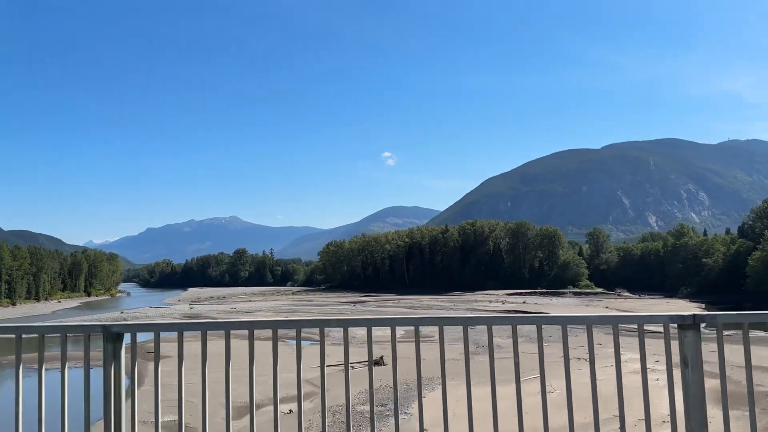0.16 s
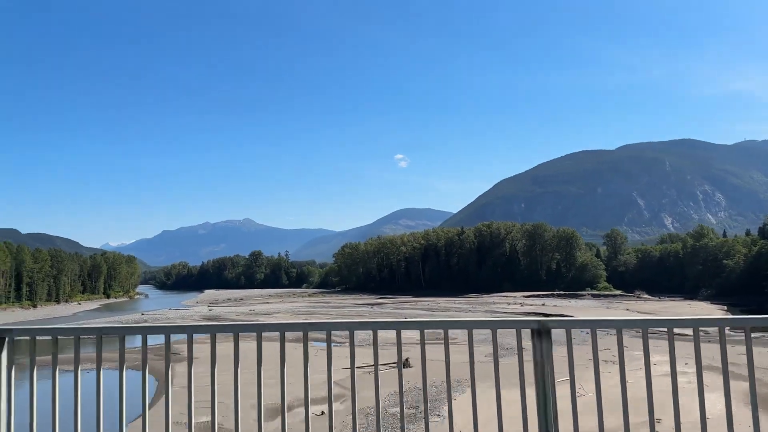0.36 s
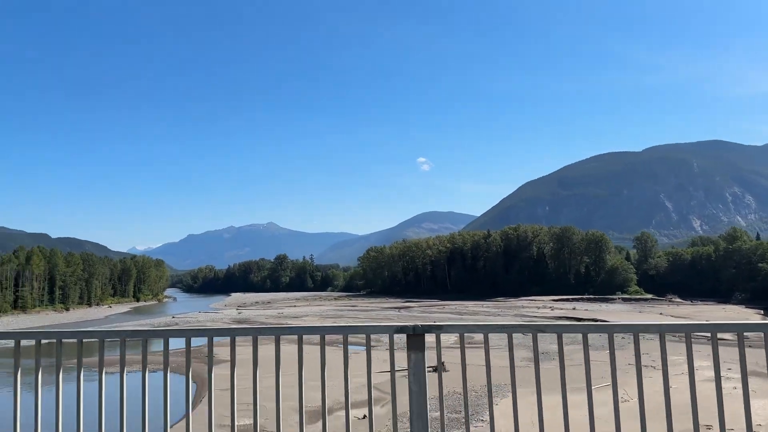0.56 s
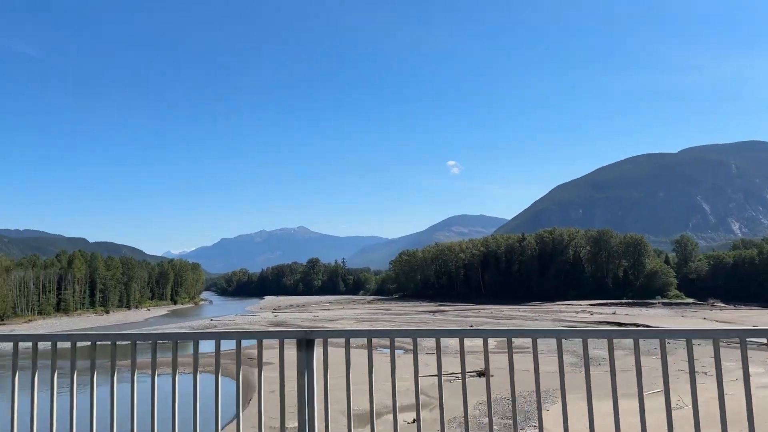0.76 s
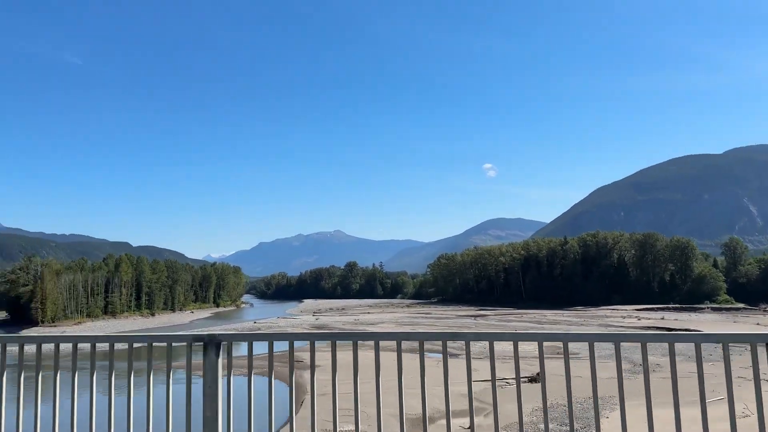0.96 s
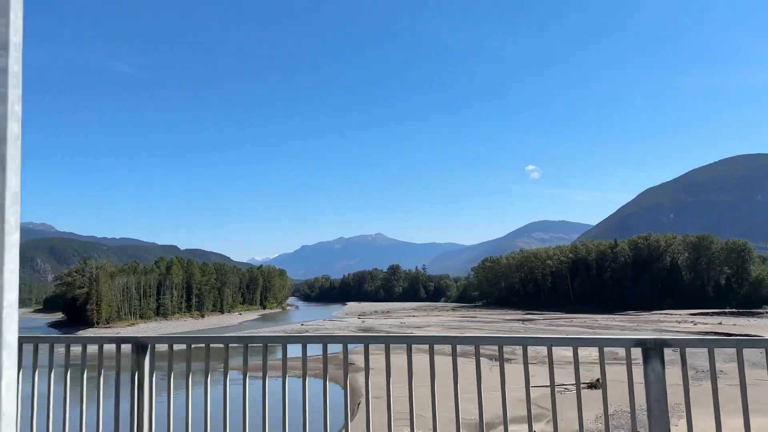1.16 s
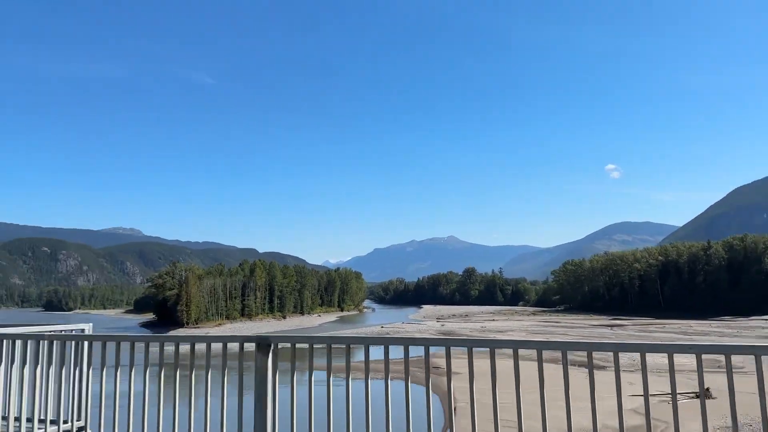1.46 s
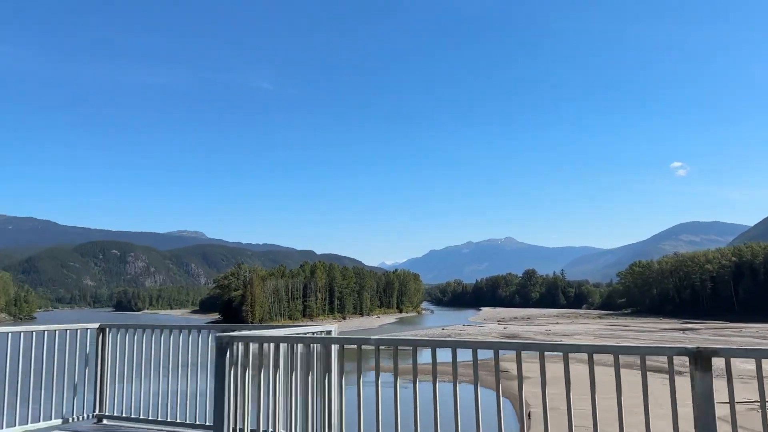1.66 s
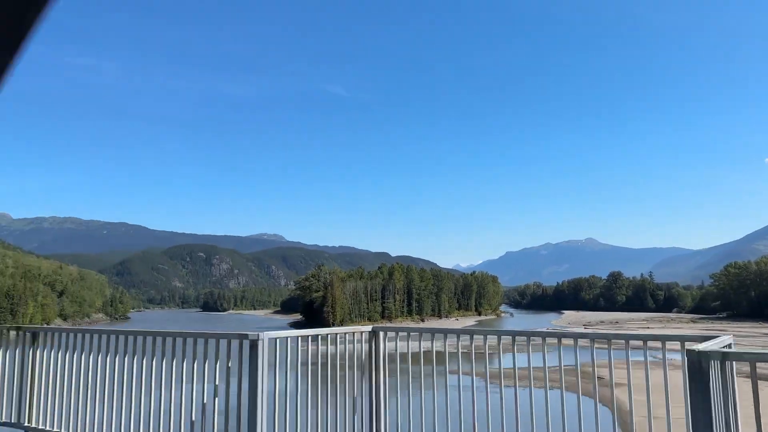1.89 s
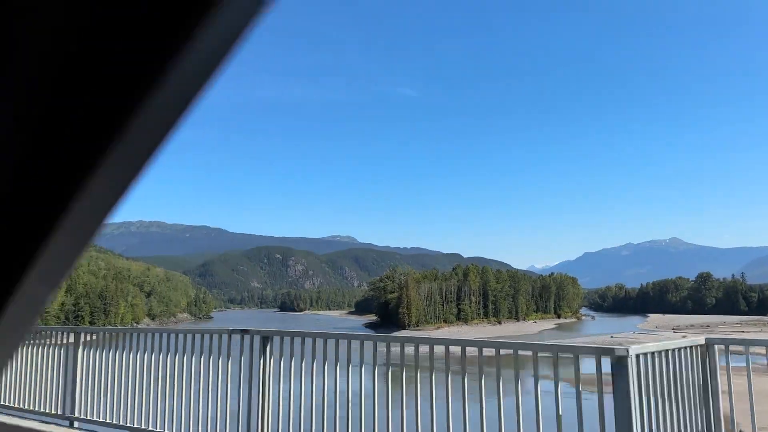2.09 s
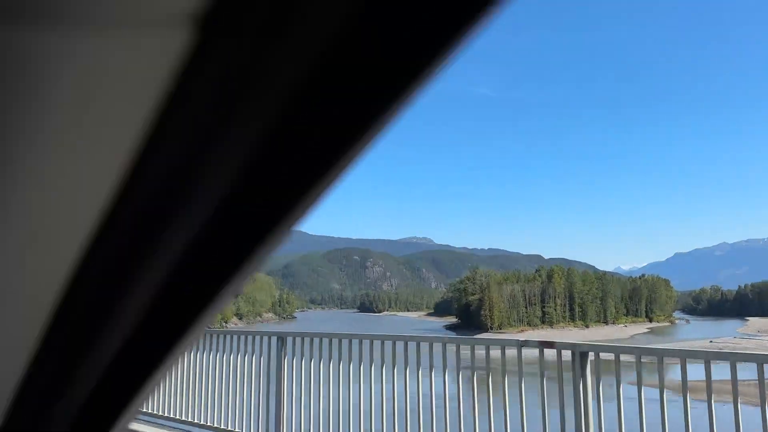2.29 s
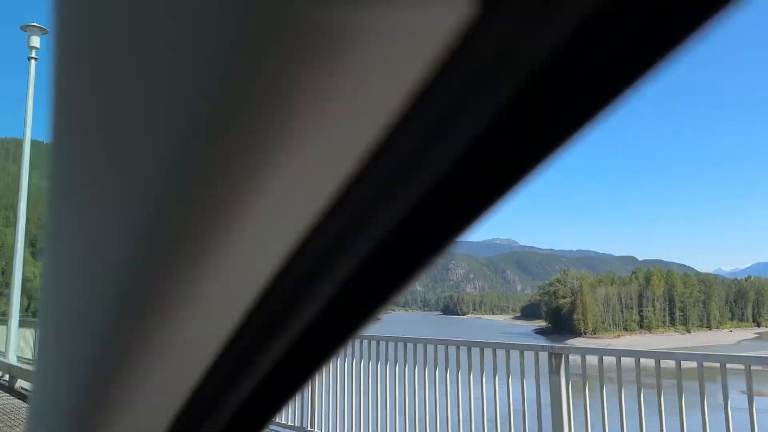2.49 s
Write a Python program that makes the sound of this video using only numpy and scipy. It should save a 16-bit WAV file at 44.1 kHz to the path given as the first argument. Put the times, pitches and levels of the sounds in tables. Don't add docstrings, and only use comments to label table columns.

```python
import sys
import numpy as np
from scipy import signal
from scipy.fft import rfft, irfft
from scipy.io import wavfile
from scipy.ndimage import uniform_filter1d

SR = 44100
rng = np.random.default_rng(int(sys.argv[2]) if len(sys.argv) > 2 else 0)


def boost(x):
    u = np.asarray(x, float) / 20
    return 10 ** u


def materialize(psi):
    bounded = np.clip(np.atleast_2d(psi).T, -1, 1)
    quanta = np.round(bounded * 32767).astype(np.int16)
    wavfile.write(sys.argv[1], SR, quanta)


N = 116424
FIRING_HZ = 87.45

# time in seconds, level in dB.
ROAD_LOAD = [(0.0, -34), (.1, -37.5), (0.29, -30), (0.4, -35), (0.67, -38.5), (.84, -31.5), (.97, -37),
             (1.09, -31.5), (1.2, -32.5), (1.3, -32.5), (1.54, -32), (1.7, -29), (1.9, -30), (1.99, -30),
             (2.1, -31), (2.27, -31.5), (2.4, -28.5), (2.5, -31.5), (2.64, -31)]


def evened(x):
    return x / np.sqrt(np.mean(x ** 2) + 1e-20)


def read(points, hz, axis=1):
    columns = np.transpose(points)
    return np.interp(np.log(hz + 1), np.log(columns[0] + 1), columns[axis])[:, None]


def along(table, t):
    times, *columns = np.transpose(table)
    return [np.interp(t, times, column) for column in columns]


def road_load_db():
    return along(ROAD_LOAD, np.arange(N) / SR)[0]


def add(mix, start, sound):
    part = mix[..., round(start * SR):][..., :sound.shape[-1]]
    part += sound[..., :part.shape[-1]]


def layer(sounds):
    out = np.zeros((2, N))
    for start, sound in sounds:
        add(out, start, sound)
    return out


def ease_in(progress):
    return np.sin(np.pi / 2 * np.minimum(progress, 1)) ** 2


def resonate(x, hz, width):
    turn = np.exp(2j * np.pi * hz * np.arange(x.shape[-1]) / SR)
    r = np.exp(-np.pi * width / SR)
    return 2 * (turn * signal.lfilter([(1 - r) ** 2], [1, -2 * r, r * r], x / turn)).real


def drift(size, rate_hz):
    z = rfft(rng.standard_normal(size))
    return evened(irfft(z / (1 + (np.fft.rfftfreq(size, 1 / SR) / rate_hz) ** 4), size))


def wash(shape, size, level_db, patchy_db, flicker_db):
    # frequency in Hz, likeness of the ports (0 to 1), phase between them in radians,
    # left-right level in dB.
    ports = [(30, .97, 0, -1), (70, .7, 0, 2.4), (300, .85, -.08, .6), (1000, .41, -.5, 4.5),
             (1400, .2, .6, 2.9), (2300, .68, 0, 2.4), (3200, .52, -1.1, 2.6), (5600, .3, -.3, 4.6),
             (7000, .58, -1.4, 2.7), (8300, .86, -2.9, 1.3), (9400, .62, -1.1, .2), (11000, 1, 0, 0),
             (13400, 1, 0, 0), (15500, .7, 2.9, -.4)]
    # time in seconds, share of the left-right level heard as the phone pans.
    pan_turn = [
        (0, 1.3),
        (1.3, 1.36),
        (2.1, 0.6),
        (2.64, 0.68),
    ]
    hop = size // 4
    frames, hz = N // hop + 5, np.fft.rfftfreq(size, 1 / SR)
    a, b, c, d, patches = rng.standard_normal((frames, len(hz), 5)).T
    patches = evened(uniform_filter1d(uniform_filter1d(patches, size=8, axis=0), size=10, axis=1))
    flicker = evened(uniform_filter1d(rng.standard_normal(frames), size=6))

    same = np.clip(read(ports, hz), 0, 1)
    left = a + 1j * b
    shared = same * left * np.exp(1j * read(ports, hz, axis=2))
    right = shared + np.sqrt(1 - same ** 2) * (c + 1j * d)
    lean = read(ports, hz, axis=3) * along(pan_turn, np.arange(frames) * hop / SR)[0] / 2
    z = np.array([left, right])
    z *= boost(read(shape, hz) + patchy_db * patches + flicker_db * flicker + np.array([lean, -lean]))
    noise = signal.istft(z, nperseg=size, noverlap=size - hop)[1][:, :N]
    return boost(level_db) * evened(noise)


def tyre_rumble():
    # frequency in Hz, density in dB per Hz.
    rumble_spectrum = [(12, -62), (27, -34), (50, 1.5), (71, 3), (100, -18.5), (131, 1.5), (178, -4),
                       (317, -11.5), (526, -9), (1500, -35.5), (1950, -45), (3300, -120)]
    return wash(rumble_spectrum, size=2048, level_db=road_load_db() + 9, patchy_db=2.0, flicker_db=-0.5)


def wind_hiss():
    # frequency in Hz, density in dB per Hz.
    hiss_spectrum = [(600, -4.5), (1100, -7), (2000, -9.5), (2900, -16), (5500, -23.5), (7500, -25.5),
                     (8300, -24.5), (9300, -25.5), (11000, -31), (16000, -56)]
    road_db = road_load_db()
    level_db = -44.5 + 0.063 * (road_db - road_db.mean())
    return wash(hiss_spectrum, size=512, level_db=level_db, patchy_db=-2.8, flicker_db=0.0)


def engine():
    # time in seconds, firing order, second order and third order in dB.
    drone_levels = [(0, -31.5, -13.5, -42), (.05, -43.5, -49, -62), (.41, -48, -37.5, -59),
                    (.55, -28, -44, -50), (.64, -41, -34, -52), (.69, -32.5, -21.5, -49),
                    (.81, -34, -22.5, -36), (.85, -35, -39.5, -46), (1.09, -23, -25.5, -45),
                    (1.23, -41, -33.5, -46), (1.34, -33.5, -31, -39), (1.58, -30, -30, -30),
                    (1.83, -29, -22.5, -34.5), (1.88, -28, -33.5, -40.5), (2.42, -34, -30.5, -40),
                    (2.45, -30.5, -39, -30), (2.485, -10.5, -33, -36), (2.64, -17, -31, -37.5)]
    # order, level in dB at full road load.
    upper_orders = [(.5, -40), (4, -35.5), (5, -35), (6, -48.5)]
    load_lift = 2.43
    speed_wander, blur, blur_hz = 0.0037, 0.24, 14

    road_db = road_load_db()
    orders = list(enumerate(along(drone_levels, np.arange(N) / SR), start=1))
    for order, full_db in upper_orders:
        orders.append((order, load_lift * (road_db - road_db.max()) + full_db))

    turns = np.cumsum(FIRING_HZ * (1 + speed_wander * drift(N, 2.4))) / SR
    out = np.zeros(N)
    for order, db in orders:
        fuzz = 1 + blur * (drift(N, blur_hz) + 1j * drift(N, blur_hz))
        line = np.exp(2j * np.pi * (order * turns + rng.random()))
        out += (boost(db) + boom_swells(order)) * (fuzz * line).real
    return 1.49 * out * boost([[.6], [-.6]])


def blow(start, thump_db, start_hz, knock_db, knock_hz):
    thump_hz, thump_drop, sag_s = 75.4, 1.165, 0.0027
    thump_t60, knock_t60 = 0.13, 0.038
    t = np.arange(0, .2, 1 / SR)
    cycles = np.cumsum(thump_hz + thump_drop * (start_hz - thump_hz) * np.exp(-t / sag_s)) / SR
    thump = boost(thump_db - 60 * t / thump_t60) * np.sin(2 * np.pi * cycles) * ease_in(t * start_hz / 0.43)
    knock = boost(knock_db - 60 * t / knock_t60) * np.sin(2 * np.pi * knock_hz * t) * ease_in(t / 0.0021)
    return start, (thump + knock) * boost([[.8], [-.8]])


def handling_knocks():
    # start in seconds, thump level in dB, thump start pitch in Hz, knock level in dB,
    # knock pitch in Hz.
    handling_blows = [(.001, -50, 200, -8.5, 186), (0.198, -38, 200, -7, 185), (0.2518, -8.5, 250, -8, 186),
                      (.318, -43, 200, -11, 165), (0.3488, -28, 300, -4.5, 234), (.417, -17.5, 200, -8.5, 511),
                      (0.4233, -35, 200, -14, 562), (.4255, -29, 201, -14, 413),
                      (0.4235, -12, 330, -16.5, 300), (0.447, -17, 120, -42, 200),
                      (0.559, -19.5, 250, -13, 268), (0.8117, -10.5, 250, -9, 191), (0.905, -8, 130, -37, 175),
                      (1.1342, -1.5, 414, -9.5, 325), (1.154, -20, 200, -13, 202),
                      (1.1658, -9.5, 121, -18, 464), (1.945, -7.5, 150, -29, 197), (2.033, -7, 120, -24, 180),
                      (2.1416, -37, 200, -2.5, 161), (2.1482, -13, 200, 1, 167), (2.163, 0.5, 100, -32, 200),
                      (2.1876, 1, 180, -11.5, 414), (2.337, -20, 150, -11, 180)]
    return layer(blow(*row) for row in handling_blows)


def rub(air, start, length, db, hz, width=33.0):
    shake = air[:, round(start * SR):][:, :round(length * SR)]
    u = np.linspace(0, 1, shake.shape[1])
    grain = boost(1.5 * evened(uniform_filter1d(rng.standard_normal(6000)[:len(u)], size=90)))
    return start, boost(db) * evened(resonate(shake * grain, hz, width)) * np.sin(np.pi * u ** .7)


def finger_rustles(air):
    # start in seconds, length in seconds, level in dB, centre in Hz, width in Hz.
    case_rustles = [(0, 0.023, -69, 4000, 5970), (0.17, .055, -47.5, 4500, 3520),
                    (0.423, 0.071, -53.5, 4800, 3960), (0.787, .04, -74, 12900, 2450),
                    (1.11, .03, -71.5, 8000, 5000), (1.315, 0.094, -53, 6600, 5960),
                    (1.555, 0.046, -54, 11100, 3490), (1.735, .03, -63.5, 12500, 3930),
                    (2.24, .025, -58, 7840, 1480), (2.48, 0.032, -51.5, 5830, 8050),
                    (2.54, 0.023, -73, 12200, 4000)]
    return layer(rub(air, *row) for row in case_rustles)


def tick(start, level_db, hz):
    # delay in seconds, level in dB.
    bounces = [
        (0, 2),
        (.0012, -11),
        (.0024, -12),
        (.0034, -1),
    ]
    t = np.arange(0, .012, 1 / SR)
    jitter = rng.uniform(0.7, 1.19, (2, len(bounces)))
    out = 0
    for k, (delay, db) in enumerate(bounces):
        u = 2 * np.pi * hz * (t - delay * jitter[:, k:k + 1]) - 5.5
        out = out - (-1) ** k * boost(db) * np.sin(u) * np.exp(-(u / 3.82) ** 2)
    return start, boost(level_db) * out * ease_in(t * hz / 0.5) * boost([[1.5], [-1.5]])


def contact_ticks():
    # start in seconds, level in dB, pitch in Hz.
    tick_events = [(0.056, -35, 700), (.250, -23, 1450), (0.25, -16.5, 547), (.348, -10.5, 650),
                   (0.348, -26.5, 1390), (.419, -28, 1490), (0.423, -26.5, 990), (0.426, -29.5, 1420),
                   (.557, -29, 650), (0.8105, -22.5, 730), (0.8112, -18.5, 1500), (0.8128, -21, 900),
                   (.8125, -26.5, 2270), (0.8125, -27.5, 1600), (0.8133, -42, 3900), (1.001, -30, 736),
                   (1.094, -38, 686), (1.131, -34, 2220), (1.131, -22.5, 1620), (1.1314, -16.5, 770),
                   (1.155, -33.5, 1410), (1.426, -21, 627), (1.598, -23.5, 630), (1.905, -19.5, 570),
                   (2.477, -24, 704)]
    return layer(tick(*row) for row in tick_events)


def boom_swells(order):
    # start in seconds, length in seconds, level in dB, nearby pitch in Hz.
    cabin_booms = [(0.082, 0.062, -20.5, 175), (0.142, 0.13, -23, 175), (0.309, 0.064, -17.5, 175),
                   (0.995, 0.059, -29.5, 175), (1.257, 0.18, -27.5, 175), (1.33, 0.12, -26, 88),
                   (1.424, .13, -26, 175), (1.44, .1, -23.5, 88), (1.3, 0.15, -34, 263),
                   (1.46, 0.12, -34, 263), (1.572, .08, -23.5, 175), (1.604, .13, -22.5, 88),
                   (1.663, 0.17, -30.5, 175), (1.683, .08, -34, 263), (1.727, 0.067, -28.5, 88),
                   (1.768, 0.051, -29.5, 175), (1.76, 0.087, -27.5, 263), (1.826, 0.044, -25, 175),
                   (1.916, 0.095, -22, 175), (1.934, 0.058, -24.5, 263), (1.997, 0.092, -26.5, 175),
                   (1.998, 0.089, -22, 88), (2.1, 0.032, -21, 175), (2.213, 0.11, -25, 175),
                   (2.316, .11, -23, 175), (2.31, 0.037, -26, 88), (2.534, 0.078, -25, 175),
                   (1.558, 0.058, -30.5, 438), (1.891, 0.051, -28.5, 525), (2.569, 0.077, -31.5, 350),
                   (1.685, 0.18, -35, 350), (1.68, 0.16, -37, 525)]
    out = np.zeros(N)
    for start, length, db, hz in cabin_booms:
        if round(hz / FIRING_HZ) == order:
            add(out, start, boost(db) * np.hanning(round(length * SR)) ** 0.51)
    return out


def seal_squeaks(air):
    # start in seconds, length in seconds, level in dB, pitch in Hz.
    squeak_events = [
        (.39, 0.026, -63, 6360),
        (0.482, 0.049, -58, 6450),
        (0.755, 0.027, -67, 6200),
    ]
    return layer(rub(air, *row) for row in squeak_events)


def scene():
    friction_air = wash([(1500, -30), (3000, 0), (12000, 0)], size=256, level_db=0, patchy_db=1.5, flicker_db=0)
    mix = tyre_rumble() + wind_hiss() + engine()
    mix += handling_knocks()
    mix += finger_rustles(friction_air)
    mix += contact_ticks()
    mix += seal_squeaks(friction_air)
    return mix


def band_limit(x):
    return signal.sosfilt(signal.butter(12, 15700, fs=SR, output="sos"), x)


def record(dry):
    limited = 1.413 * np.tanh(dry / 1.599)
    return band_limit(limited)


dry = scene()
out = record(dry)
materialize(out)
```